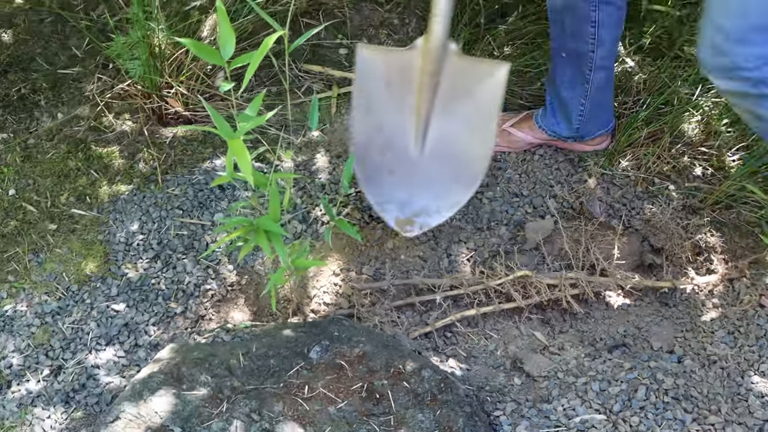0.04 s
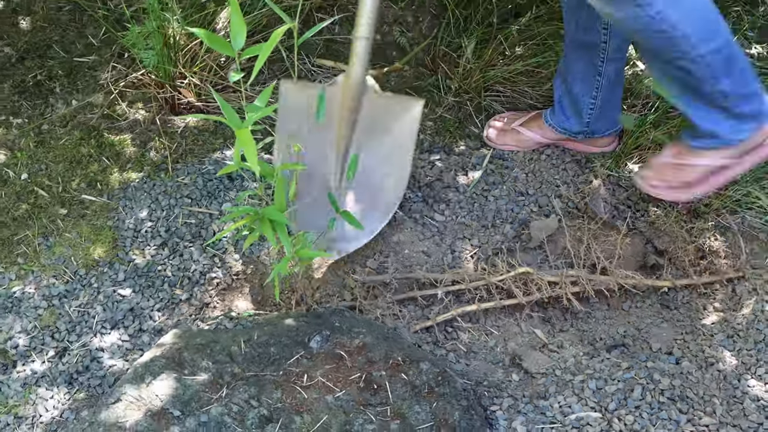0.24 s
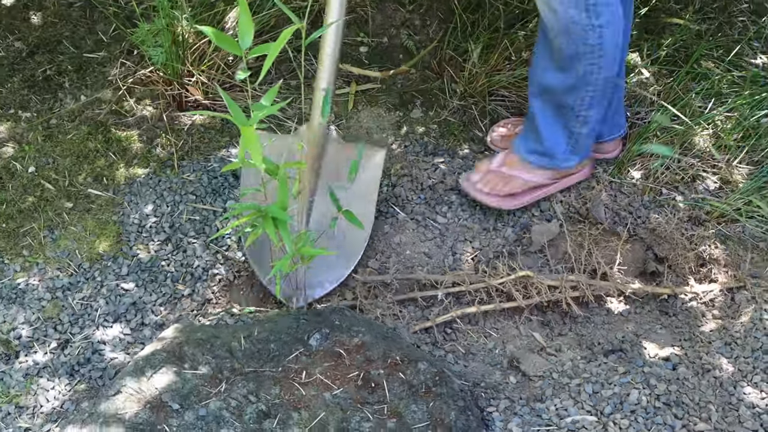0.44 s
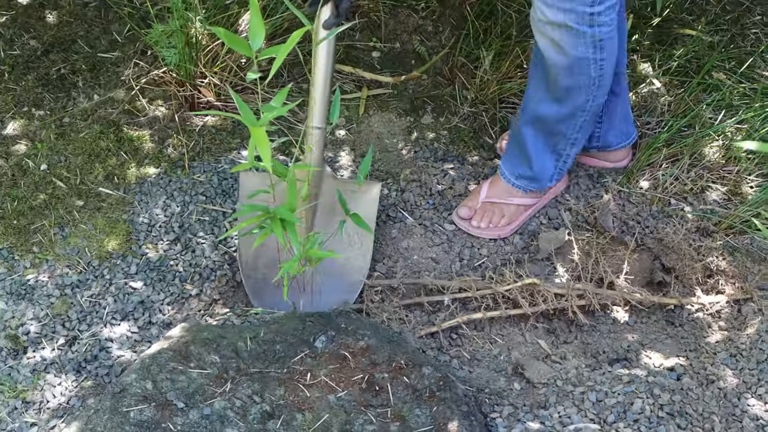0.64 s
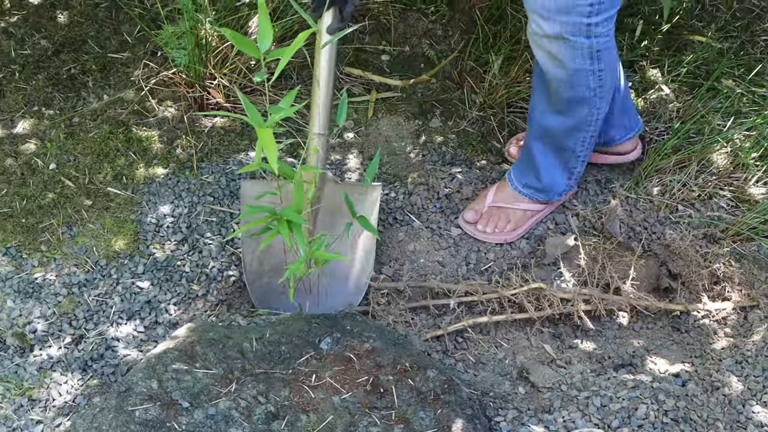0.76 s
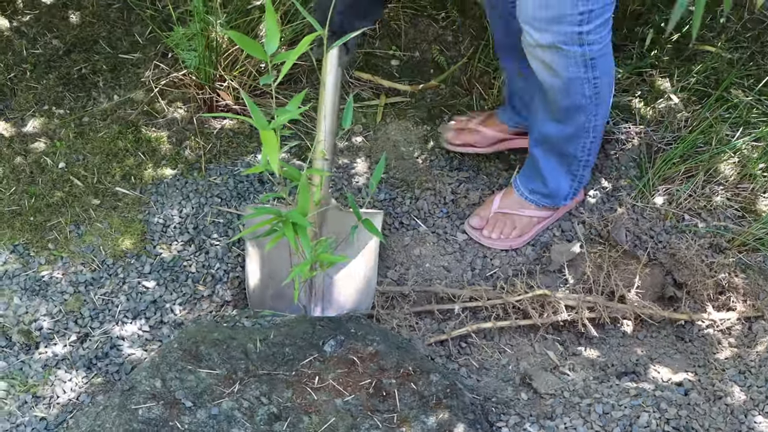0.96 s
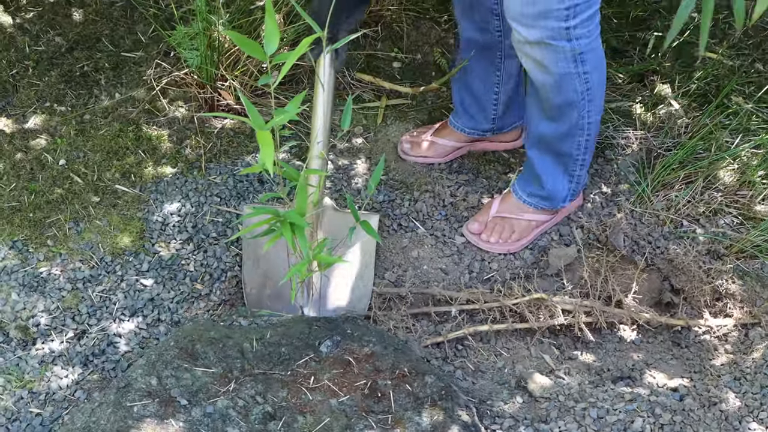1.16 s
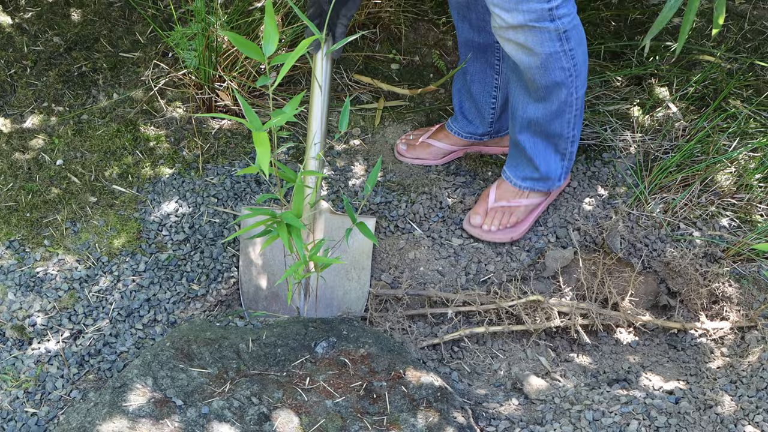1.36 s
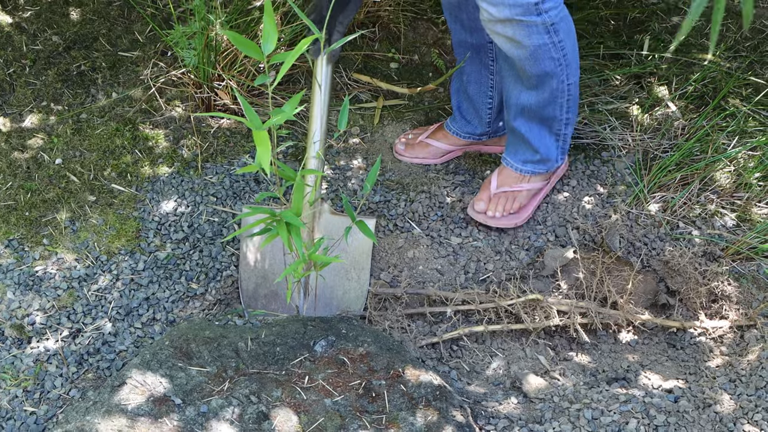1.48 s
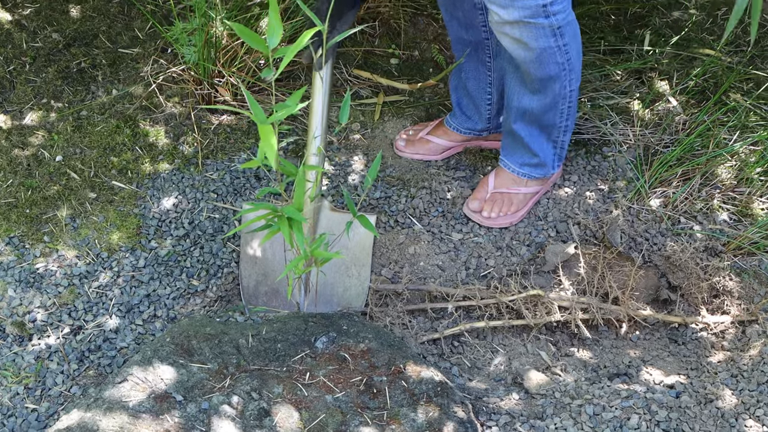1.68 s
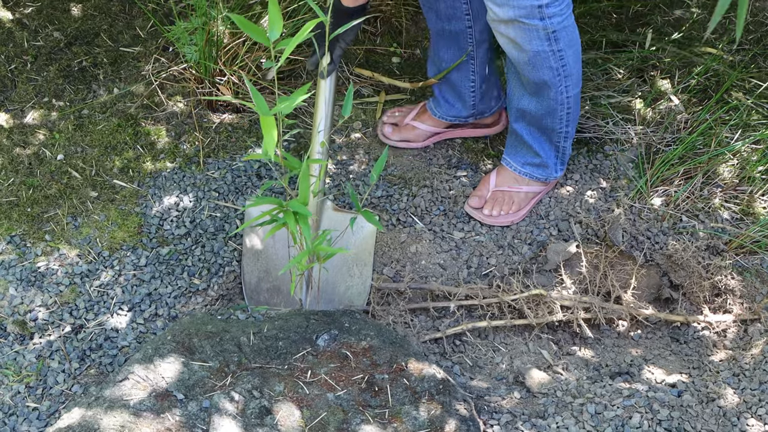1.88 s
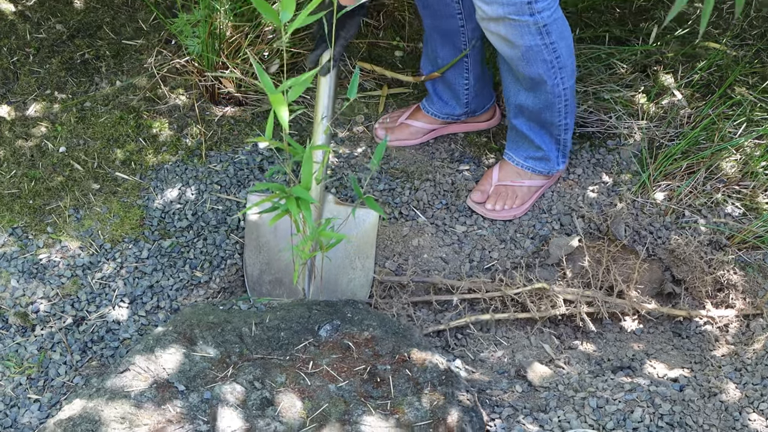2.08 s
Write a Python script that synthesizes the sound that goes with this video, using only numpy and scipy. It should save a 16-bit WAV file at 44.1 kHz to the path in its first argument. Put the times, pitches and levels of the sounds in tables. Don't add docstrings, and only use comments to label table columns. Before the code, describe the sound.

A steel spade scrapes into gritty gravel, drives home with a crunching thud, then clacks sharply

```python
import sys
import numpy as np
from scipy import signal
from scipy.fft import rfft, irfft
from scipy.io import wavfile
from scipy.ndimage import uniform_filter1d

SR = 44100
rng = np.random.default_rng(int(sys.argv[2]) if len(sys.argv) > 2 else 0)


def put_to_file(sound):
    columns = np.atleast_2d(sound).T
    safe = np.clip(columns, -1, 1)
    whole_steps = np.round(safe * 32767)
    wavfile.write(sys.argv[1], SR, whole_steps.astype(np.int16))


def boost(x):
    u = np.asarray(x, float) / 20
    return 10 ** u


N = 93492
SECONDS = np.arange(N) / SR


def rms_one(x):
    return x / np.sqrt(np.mean(x ** 2) + 1e-20)


def curve_db(rows):
    rows = np.array(rows)
    return np.interp(SECONDS, rows[:, 0], rows[:, 1], left=-150, right=-150)


def colour(x, spectrum):
    hz, db = np.transpose(spectrum)
    grid = np.maximum(np.arange(2049) * SR / 4096, 5)
    log_gain = np.log(boost(np.interp(np.log(grid), np.log(hz), db)))
    cepstrum = irfft(log_gain)
    cepstrum[1:2048] *= 2
    cepstrum[2049:] = 0
    response = irfft(np.exp(rfft(cepstrum)))
    return signal.fftconvolve(x, response)[:len(x)]


def cut(x, order, hz, kind):
    return signal.sosfilt(signal.butter(order, hz, kind, fs=SR, output="sos"), x)


def resonate(x, hz, width_hz):
    r = np.exp(-np.pi * width_hz / SR)
    poles = [1, -2 * r * np.cos(2 * np.pi * hz / SR), r * r]
    return signal.lfilter([(1 - r * r) / 2, 0, (r * r - 1) / 2], poles, x + 1e-18)


def resonate_twice(x, hz, width_hz):
    return resonate(resonate(x, hz, width_hz), hz, width_hz)


def drift(rate_hz):
    r = np.exp(-2 * np.pi * rate_hz / SR)
    return rms_one(signal.lfilter([1], [1, -2 * r, r * r], rng.standard_normal(N + SR))[SR:])


def grains(per_s, spread_db):
    sizes = boost(spread_db * np.minimum(rng.exponential(1, N), 4)) * rng.choice([-1, 1], N)
    return sizes * (rng.random(N) < per_s / SR)


def struck(start_s, hz, db, t60_s):
    t = np.maximum(SECONDS - start_s, 0)
    return boost(db - 60 * t / t60_s) * np.sin(2 * np.pi * hz * t)


# frequency in Hz, level in dB per Hz.
HUM = [(12, -77), (20, 7), (213, 1.5), (315, 5.5), (484, -7), (1200, -19), (1560, -34), (2640, -120)]
# frequency in Hz, level in dB per Hz.
AIR = [(530, -32), (900, -14), (2070, -0.5), (2220, -2), (3860, -0.5), (5610, -9.5), (14000, -16),
       (16000, -9.5)]
HUM_DB, AIR_DB = -63.5, -61.5


def garden():
    hum, air = (rms_one(colour(rng.standard_normal(N + SR), c)[SR:]) for c in (HUM, AIR))
    return boost(HUM_DB + 0.19 * drift(17)) * hum + boost(AIR_DB + 0.15 * drift(35)) * air


# time in seconds, crunch level in dB.
SHUFFLE = [(0, -35.5), (.06, -42), (.17, -58), (.36, -59), (.41, -45), (.48, -63), (.62, -59.5),
           (.85, -58.5), (1.0, -46.5), (1.08, -54), (1.25, -47.5), (1.45, -53.5), (1.6, -48.5),
           (1.66, -57.5), (1.8, -49.5), (1.95, -43), (2.12, -54)]
# frequency in Hz, level in dB per Hz.
CRUNCH = [(88, -42), (150, -4.5), (805, 3), (1310, 2), (1660, -4), (3620, -3.5), (4860, -19.5),
          (12900, -20), (16000, -47)]
GRAINS_PER_S, GRAIN_SPREAD_DB, GRAIN_CYCLES, PATCH_DB = 3500, 3.2, 6.1, 3.5


def gravel():
    clicks = grains(GRAINS_PER_S * boost(2.6 * drift(29)), GRAIN_SPREAD_DB)
    pitches = np.geomspace(250, 14000, 20)
    dealt = rng.integers(0, 20, N)
    rings = 0
    for k, hz in enumerate(pitches):
        patch = boost(PATCH_DB * drift(9.5))
        hits = clicks * (dealt == k) + boost(-20) * rng.standard_normal(N)
        rings = rings + patch * resonate(resonate(hits, hz, 2.0 * hz / GRAIN_CYCLES), hz, hz / 2)
    return boost(curve_db(SHUFFLE)) * rms_one(colour(rings, CRUNCH))


# start in seconds, length in seconds, pitch in Hz, width in Hz, level in dB.
RUBS = [
    (1.69, 0.2, 850, 55, -53),
    (1.3, 0.105, 334, 130, -54.5),
    (-.04, 0.087, 4150, 460, -39),
    (-.1, 0.306, 445, 200, -49.5),
    (0.63, 0.087, 1800, 110, -54.5),
    (1.26, 0.18, 820, 380, -51.5),
]


def rubbing():
    out = 0
    for start_s, length_s, hz, width_hz, db in RUBS:
        across = (SECONDS - start_s) / length_s * 2 - 1
        hold = np.clip(1 - across ** 4, 0, 1)
        rub = resonate_twice(rng.standard_normal(N), hz, width_hz)
        out = out + boost(db + 2 * drift(30)) * hold * rms_one(rub)
    return out


# start in seconds, peak in dB, t60 in seconds, centre in Hz.
SPRAYS = [(0.0004, -19.5, 0.15, 4600), (0.071, -36, 0.04, 7500), (0.349, -36, 0.21, 7450),
          (0.3954, -24, 0.21, 11300), (0.407, -23, 0.13, 7600), (0.6815, -19, 0.16, 5100),
          (0.822, -26.5, 0.12, 5800), (0.972, -19, 0.14, 8750), (1.0048, -41, 0.056, 9000),
          (1.025, -38, 0.04, 9000), (1.042, -35.5, 0.046, 6030), (0.304, -45.5, 0.044, 8500),
          (1.883, -33, 0.08, 12700), (1.935, -30.5, 0.16, 9100), (1.1606, -38, 0.11, 13200),
          (1.1769, -34, 0.11, 13200), (1.279, -34, 0.2, 13400), (1.3027, -26, 0.13, 7700),
          (1.316, -31.5, 0.13, 13500), (1.4618, -25, 0.1, 5900), (1.496, -36, 0.15, 5760),
          (1.5163, -36.5, 0.093, 14000), (1.5677, -35, 0.41, 7040), (1.9535, -29, 0.2, 6600),
          (2.0305, -21, 0.13, 12100), (2.0658, -28, 0.11, 13600)]
SPRAY_DB, SPRAY_OCTAVES, SPRAY_WIDE_DB, SPRAY_GRAINS_PER_S = -20, 1, 2, 6000
TICK_DB, TICK_T60_S = 5, .02
KNOCK_LAG_S = .0015


def sand():
    out, t = np.zeros(N + SR), np.arange(8000) / SR
    lumps = boost(3.5 * drift(120))
    shape = (len(SPRAYS), 8000)
    noise = rng.standard_normal(shape) * (rng.random(shape) < SPRAY_GRAINS_PER_S / SR)
    for (start_s, db, t60_s, hz), n in zip(SPRAYS, noise):
        peak = resonate_twice(n, hz, SPRAY_OCTAVES * hz)
        hiss = rms_one(peak) + boost(SPRAY_WIDE_DB) * rms_one(resonate(n, 4700, 7300))
        tick = 1 + boost(TICK_DB - 60 * t / TICK_T60_S)
        dying = boost(db + SPRAY_DB - 60 * t / max(t60_s, .005)) * np.minimum(t / 0.00084, 1)
        i = int((start_s + KNOCK_LAG_S) * SR)
        out[i:i + 8000] += tick * dying * rms_one(hiss) * lumps[i % 9000:][:8000]
    return out[:N]


# start in seconds, peak in dB, low mode in Hz,
# high mode in Hz, share of the high mode in dB.
PEBBLES = [(0.0230, -12, 1320, 3300, -5), (0.1045, -12, 2300, 3300, -3), (0.1278, -18, 2800, 3700, -2),
           (0.048, -26, 900, 3720, -16), (0.0515, -29, 900, 3720, -20), (0.109, -27, 1250, 3340, -20),
           (0.135, -33, 600, 3300, -2), (0.216, -40, 2090, 6100, -3), (0.228, -38, 1540, 2300, -4),
           (0.285, -33, 980, 2200, -15), (0.398, -24, 1170, 2940, -9), (0.409, -31, 2100, 7500, -3),
           (0.592, -38, 1330, 2600, -4), (0.933, -12, 900, 3500, -5), (0.9625, -13, 900, 2400, -8),
           (0.971, -12, 870, 3900, -8), (1.006, -32, 2000, 3920, -6), (1.041, -37, 660, 2210, -4),
           (1.113, -36, 680, 3530, -4), (1.145, -35, 1300, 2390, -8), (1.177, -37, 1320, 3650, -6),
           (1.204, -38, 1820, 3640, -6),
           (1.242, -26.5, 1660, 2950, -3), (1.249, -29.5, 2600, 3460, -11), (1.305, -29, 860, 4040, -3),
               (1.315, -31, 1180, 2800, -19), (1.355, -28, 820, 2240, -25), (1.378, -24, 750, 3660, -21),
               (1.384, -24.5, 1190, 2170, -5), (1.394, -24.5, 2160, 3800, -5),
               (1.413, -22, 2200, 4100, -7.5), (1.463, -23, 1000, 2080, -10), (1.497, -32, 1100, 3300, 2),
               (1.516, -34, 1210, 3320, 2), (1.544, -48, 960, 3700, 2), (1.569, -25, 721, 3300, -1),
               (1.586, -17.5, 737, 2480, -10), (1.589, -27, 1190, 3850, -2.5),
           (1.605, -29.5, 780, 2330, -6), (1.803, -28, 1080, 4070, -23),
                (1.827, -28.5, 950, 3570, -26), (1.845, -28.5, 540, 3920, -39), (1.87, -21, 434, 1130, -7),
                (1.874, -23.5, 700, 1300, -6), (1.904, -24.5, 1240, 3300, -35),
                (1.928, -19.5, 700, 2120, -8), (1.955, -22, 635, 4070, -7.5),
                (1.972, -25, 1500, 3260, -4.5), (1.991, -23.5, 800, 2560, -6)]
PEBBLE_CYCLES, PEBBLE_T60_S = 4.5, .005
CRACK_DB, CRACK_T60_S, CRACK_WIDTH_HZ = -15, .005, 3000
SETTLE_DB, SETTLE_T60_S = -22, .045


def pebbles():
    rows = PEBBLES
    out, t = np.zeros(N + SR), np.arange(4000) / SR
    noise = rng.standard_normal((len(rows), 4000))
    for (start_s, db, low_hz, high_hz, high_db), n in zip(rows, noise):
        share = np.clip(boost(high_db), 0, 1)
        tone = 0
        for gain, hz in ((np.sqrt(1 - share ** 2), low_hz), (share, high_hz)):
            onset = np.sin(np.pi / 2 * np.minimum(t * hz * 1.35, 1)) ** 2
            fade = boost(-60 * t / (PEBBLE_T60_S + PEBBLE_CYCLES / hz))
            tone = tone + gain * np.sin(2 * np.pi * hz * t) * fade * onset
        dying = boost(CRACK_DB - 60 * t / CRACK_T60_S) + boost(SETTLE_DB - 60 * t / SETTLE_T60_S)
        dying = dying * np.minimum(t * high_hz, 1) ** 2
        grit = resonate(colour(n ** 3, CRUNCH), high_hz / 2, CRACK_WIDTH_HZ)
        grit = resonate(grit, high_hz / 2, 2 * CRACK_WIDTH_HZ)
        grit = grit + 2 * resonate(n, low_hz, low_hz / 4) + 2 * share * resonate(n, high_hz, high_hz / 5)
        i = int((start_s + KNOCK_LAG_S) * SR)
        out[i:i + 4000] += boost(db) * (tone + dying * rms_one(grit))
    return cut(out[:N], 4, 280, "high")


# time in seconds, level in dB.
STROKES = [
    [(.630, -48), (.637, -37), (.640, -32.5), (.654, -38), (.658, -39.5), (.678, -40.5), (.69, -37.5),
     (.70, -61)],
    [(.680, -57), (.684, -42), (.70, -40), (.728, -34.5), (.74, -40), (.765, -41), (.770, -48.5),
     (.785, -48.5), (.812, -77)],
    [(.882, -47), (.887, -42), (.912, -31), (.932, -19.5), (.939, -19), (.95, -11), (.962, -18.5),
     (.975, -29.5), (.992, -65)],
]
# pitch in Hz, width in Hz, level in dB touching, in dB sliding, in dB driven.
BLADE = [(805, 240, -28, -22, -1.5), (1333, 11.6, 11, 9.5, 8), (1500, 120, -29, -8, 0),
         (1657, 14, 2, -10, -17), (2030, 24, -13, -20, -17), (2305, 71, 1, 11.5, -0.5),
         (2590, 72, -4, -4, 5.5), (2750, 22, -16, 14, -17), (3007, 49, 3, -2, -6), (3526, 80, -6, -9, 4.5),
         (3720, 30, -4.5, -5, -2), (4100, 64, -12, -0.5, 2.5)]
# frequency in Hz, level in dB per Hz.
RASP_SLIDE = [(180, -61), (300, -32), (546, -16.5), (1300, -3.5), (1930, -8), (2700, -4), (4750, -17.5),
              (11900, -21.5), (16000, -31)]
RASP_DRIVE = [(88, -51), (150, -24), (624, -19.5), (1040, -6), (1340, -5.5), (2140, -13.5), (4160, -14.5),
              (4760, -10), (16000, -12.5)]
RING_DB = [
    3,
    0,
    1,
]
SCRAPES_PER_S, SCRAPE_SPREAD_DB, CATCH_DB, BLADE_PATCH_DB = 6000, 3.3, 2.2, 3.5
BRIGHT_HZ, BRIGHT_FOLLOWS = 4800, .35


def blade():
    out = 0
    for j, (stroke, rasp) in enumerate(zip(STROKES, (RASP_SLIDE, RASP_SLIDE, RASP_DRIVE))):
        scrapes = grains(SCRAPES_PER_S, SCRAPE_SPREAD_DB) * boost(CATCH_DB * drift(150))
        rings = 0
        for k, (hz, width_hz, *db) in enumerate(BLADE):
            patch = boost(db[j] + BLADE_PATCH_DB * drift(24))
            rings = rings + patch * resonate(scrapes, hz, width_hz) * (-1) ** k
        body = rms_one(colour(scrapes, rasp)) + boost(RING_DB[j]) * rms_one(rings)
        force_db = curve_db(stroke)
        high = cut(body, 2, BRIGHT_HZ, "high")
        low = cut(body, 2, BRIGHT_HZ, "low")
        body = low - high * boost(BRIGHT_FOLLOWS * (force_db - force_db.max()))
        power = uniform_filter1d(body ** 2, size=900)
        out = out + boost(force_db) * body / np.sqrt(power + 1e-12)
    return out


# start in seconds, peak in dB, pitch in Hz.
THUDS = [
    (0.958, -32.5, 220),
    (0.963, -46, 70.5),
    (1.693, -49, 74.4),
]


def thuds():
    return sum(struck(start_s, hz, db, 0.094) for start_s, db, hz in THUDS)


# time in seconds, level in dB.
TRICKLE = [(0.96, -61), (1.124, -59), (1.27, -59), (1.35, -63), (1.408, -70), (1.5, -60), (1.63, -66),
           (1.824, -66), (1.95, -56), (2.12, -60)]
TRICKLES_PER_S, TRICKLE_HZ, TRICKLE_WIDTH_HZ, TRICKLE_DB = 8000, 13000, 8000, -3


def trickle():
    fine = grains(TRICKLES_PER_S * boost(2 * drift(40)), 2.5)
    speckle = resonate_twice(fine, TRICKLE_HZ, TRICKLE_WIDTH_HZ)
    return boost(curve_db(TRICKLE) + TRICKLE_DB) * rms_one(speckle)


# pitch in Hz, level in dB, t60 in seconds.
CLACK = [(653, -9.5, 0.032), (1300, -10, 0.028), (1610, -14, 0.033), (2520, -14, 0.035),
         (3040, -10.5, 0.034), (3380, -8, 0.046), (3650, -18, .06), (3930, -27.5, 0.24), (4340, -10, 0.036),
         (5000, -15, .04), (5490, -9, 0.029), (6060, -7.5, 0.02), (6670, -16, 0.056)]
CLACK_AT_S, CLACK_DB, CLACK_DAMP = 2.0308, -17, 0.73
SNAP_DB, SNAP_T60_S = -18.5, 0.0044


def clack():
    modes = sum(struck(CLACK_AT_S, hz, CLACK_DB + db, CLACK_DAMP * t60_s) * (-1) ** k
                for k, (hz, db, t60_s) in enumerate(CLACK))
    since = SECONDS - CLACK_AT_S
    fade = (since >= 0) * boost(SNAP_DB - 60 * np.maximum(since, 0) / SNAP_T60_S)
    return cut(modes + fade * rng.standard_normal(N), 4, 400, "high")


def scene():
    hard = blade() + gravel() + pebbles() + clack() + thuds()
    soft = rubbing() + sand() + garden() + trickle()
    return (hard + soft)[None]


def roll_off(x):
    return signal.sosfilt(signal.butter(12, 16510, fs=SR, output="sos"), x)


MIC_HZ, MIC_WIDTH_HZ, MIC_DB = 3900, 910, -3.5
TOP = .72


def record(dry):
    x = dry + boost(MIC_DB) * resonate_twice(dry, MIC_HZ, MIC_WIDTH_HZ)
    x = TOP * np.tanh(x / TOP)
    x = signal.sosfilt(signal.cheby2(12, 40, 16100, fs=SR, output="sos"), x)
    x = cut(x, 2, 55, "high")
    return roll_off(x)


dry = scene()
out = record(dry)
put_to_file(out)
```